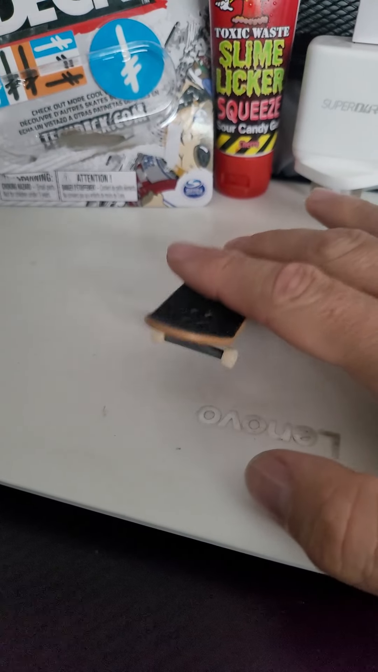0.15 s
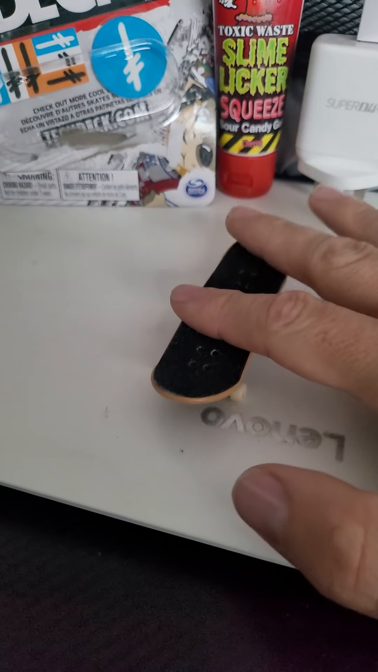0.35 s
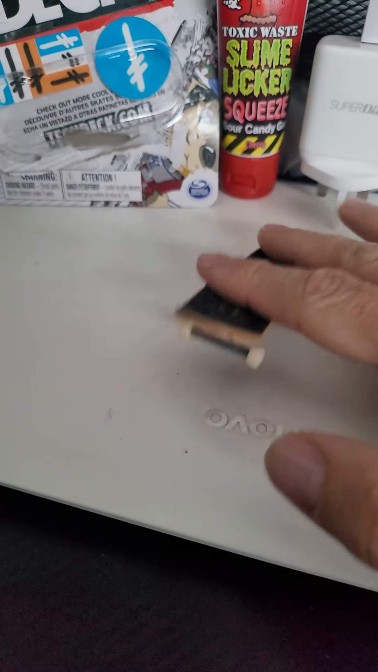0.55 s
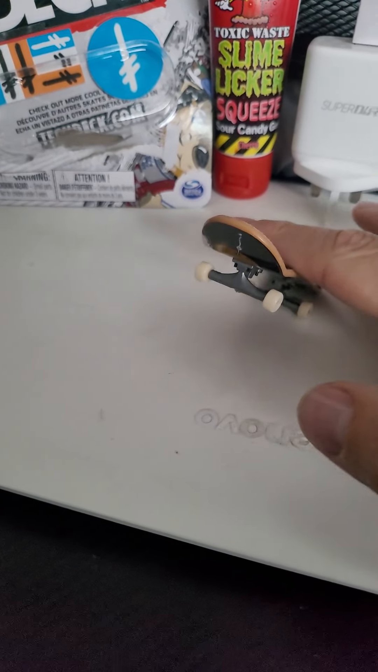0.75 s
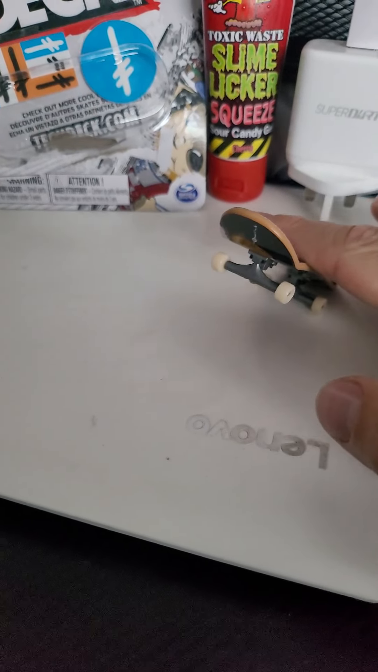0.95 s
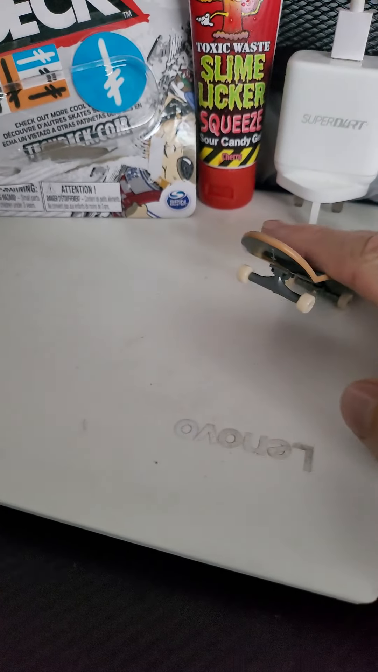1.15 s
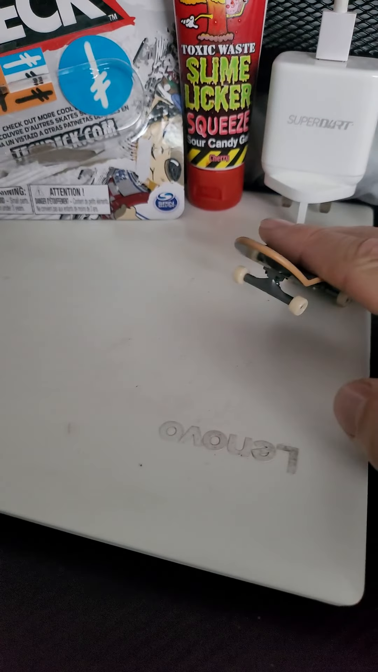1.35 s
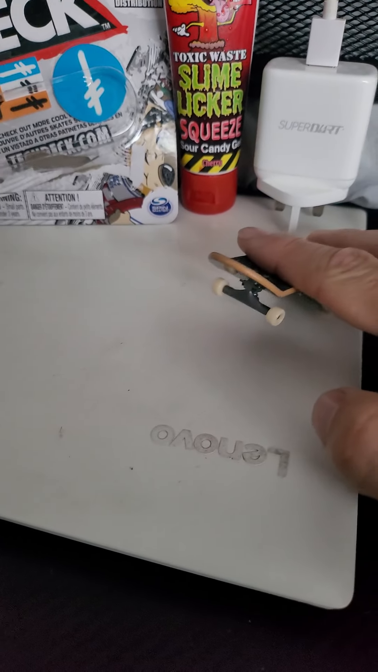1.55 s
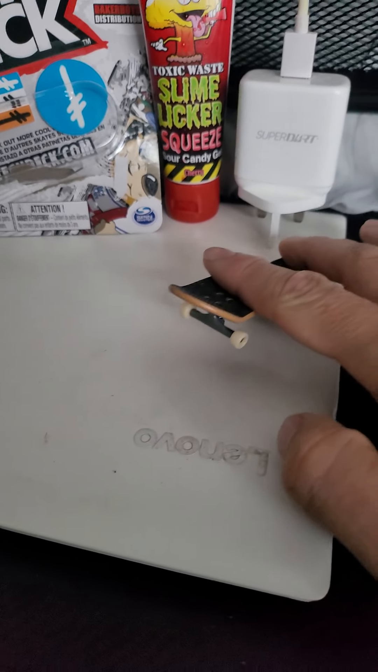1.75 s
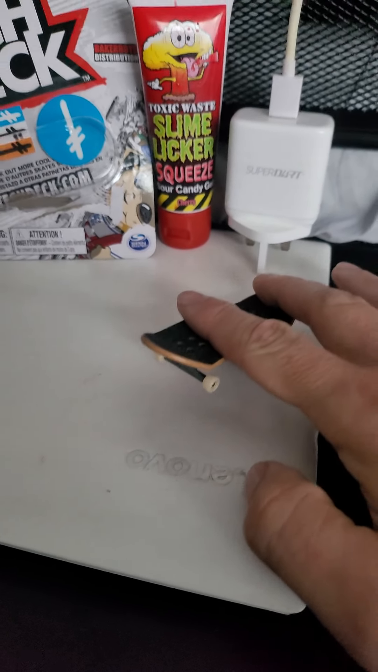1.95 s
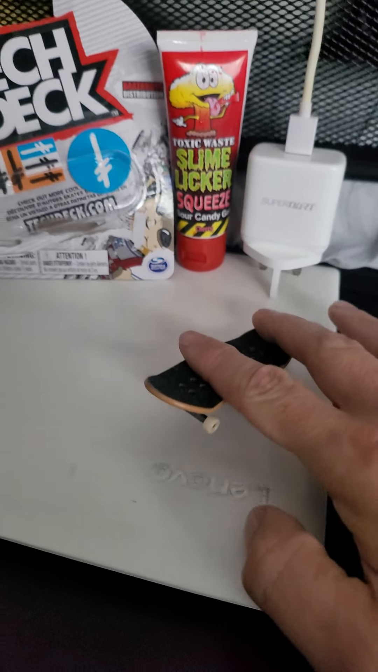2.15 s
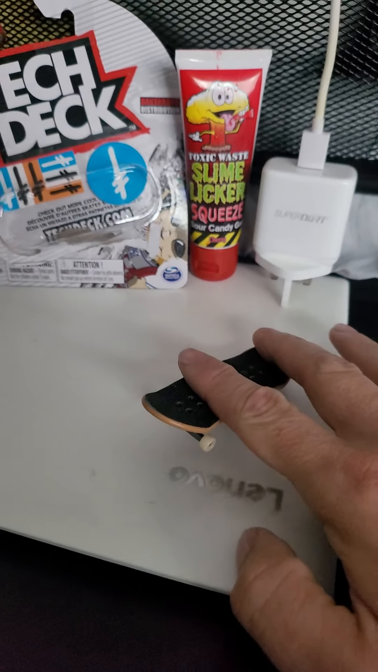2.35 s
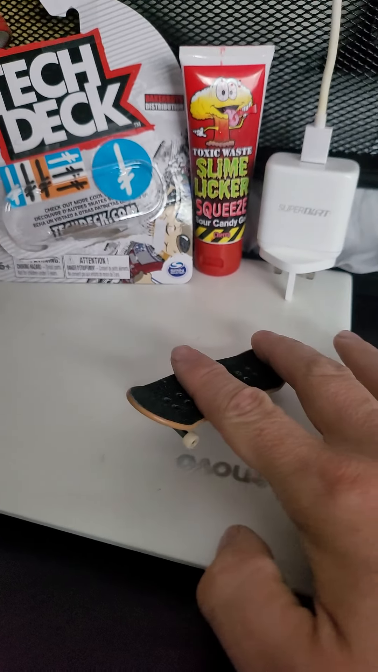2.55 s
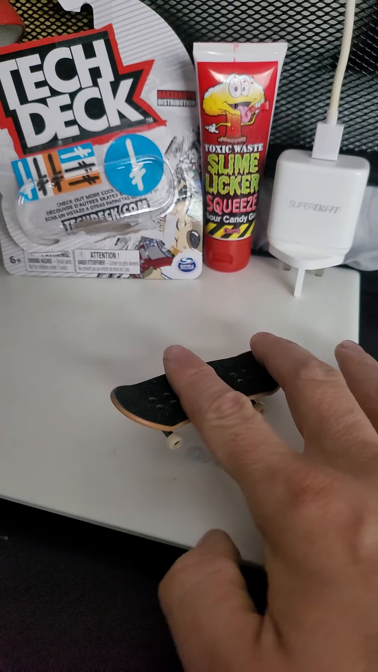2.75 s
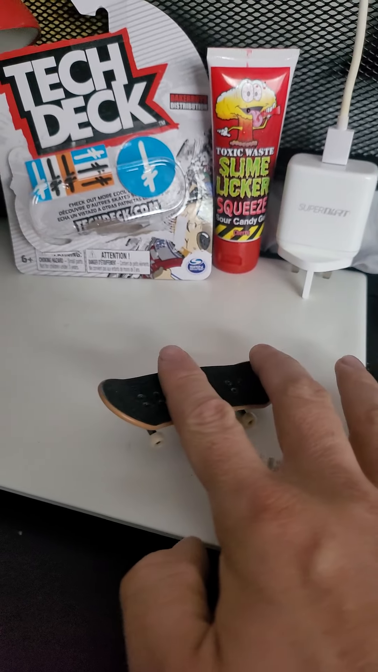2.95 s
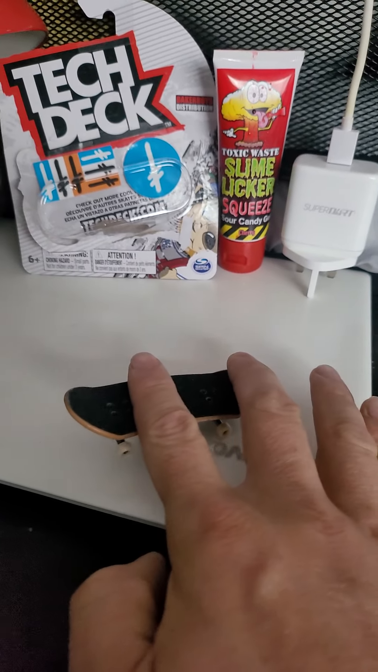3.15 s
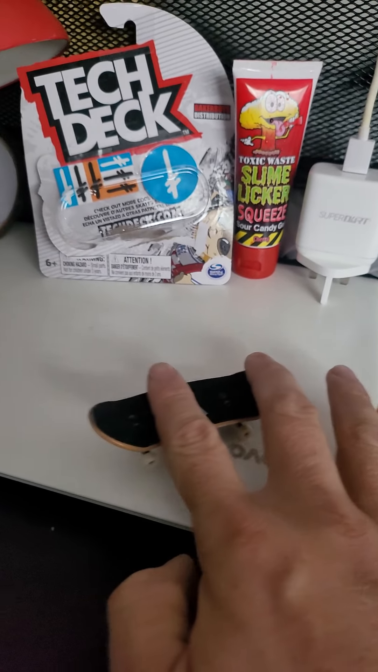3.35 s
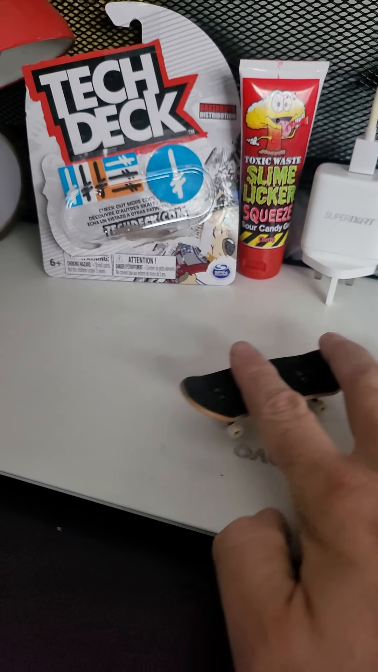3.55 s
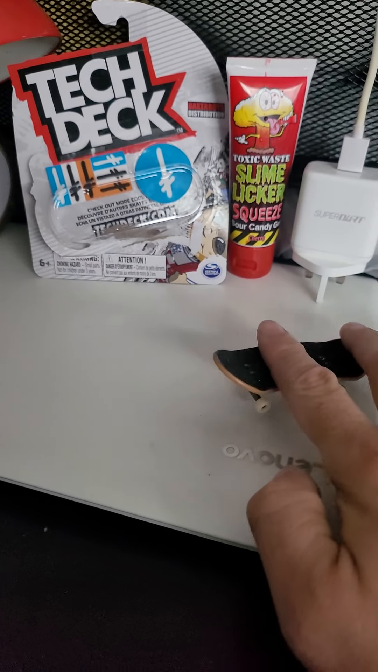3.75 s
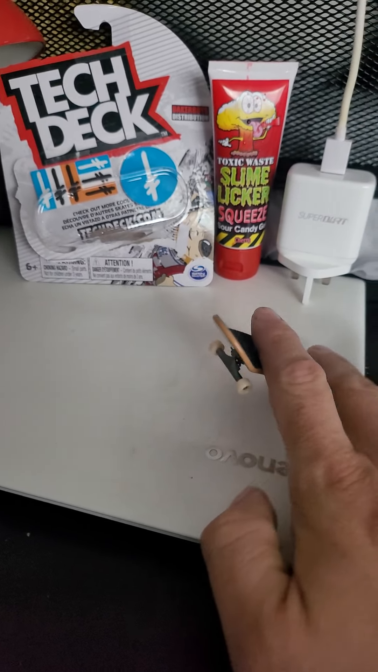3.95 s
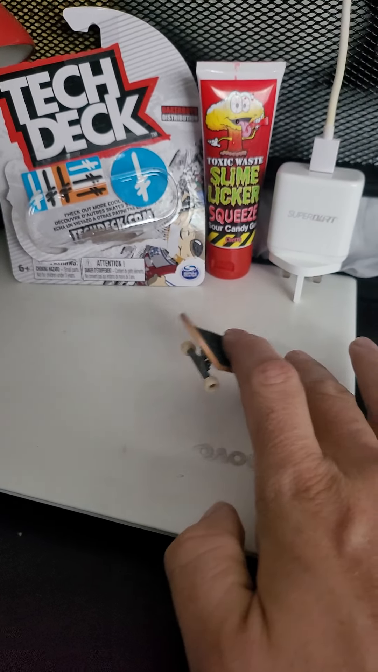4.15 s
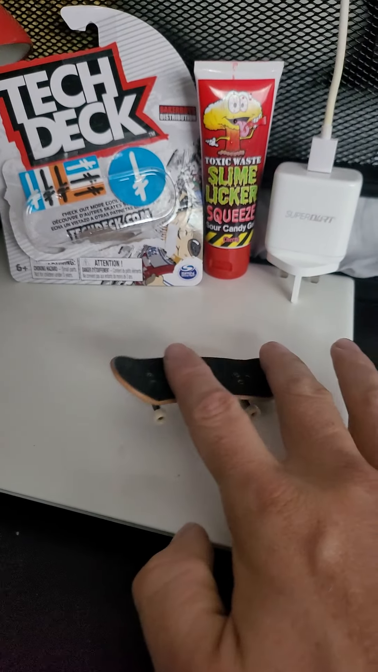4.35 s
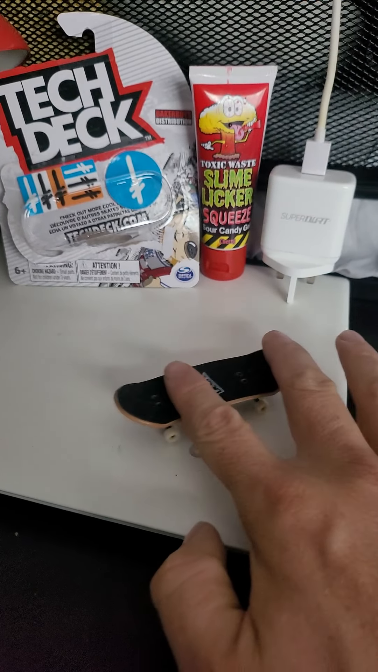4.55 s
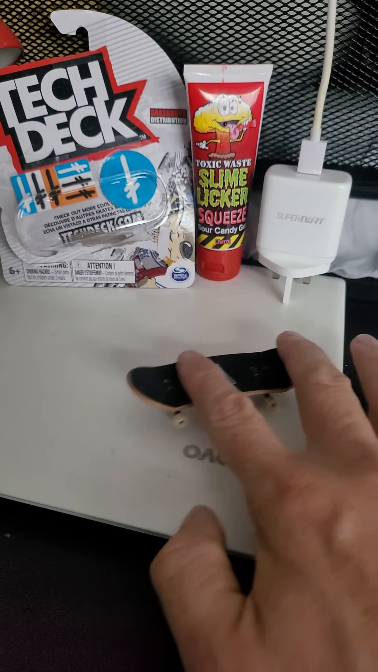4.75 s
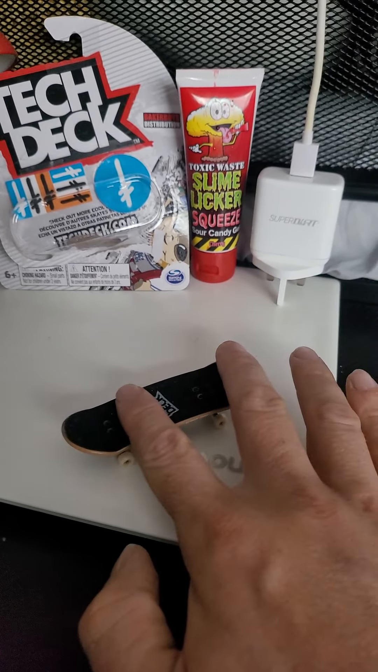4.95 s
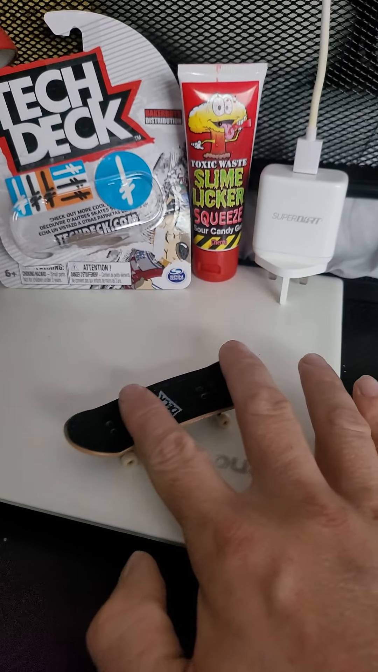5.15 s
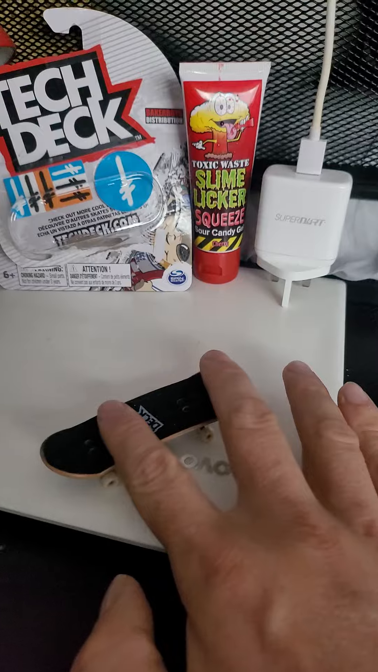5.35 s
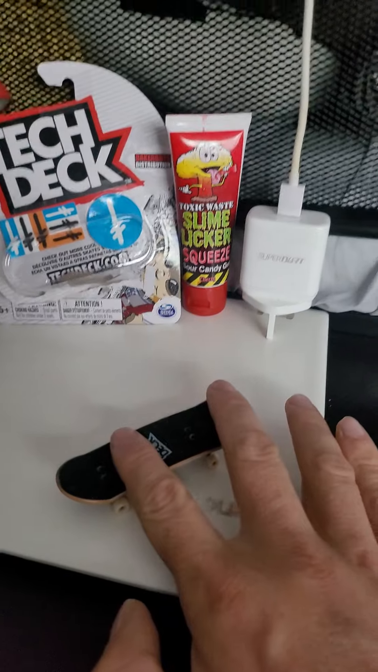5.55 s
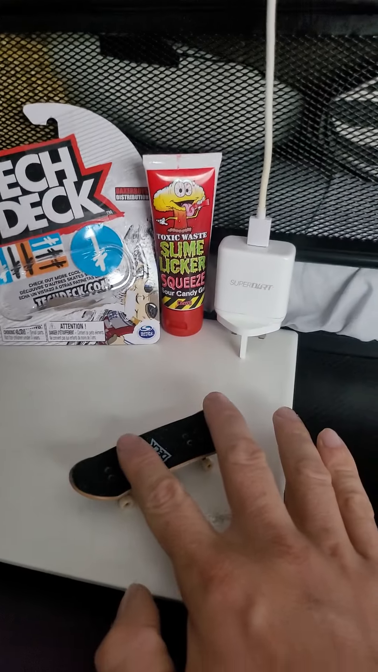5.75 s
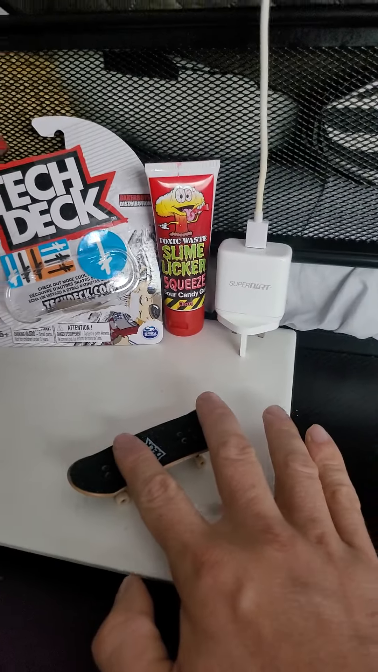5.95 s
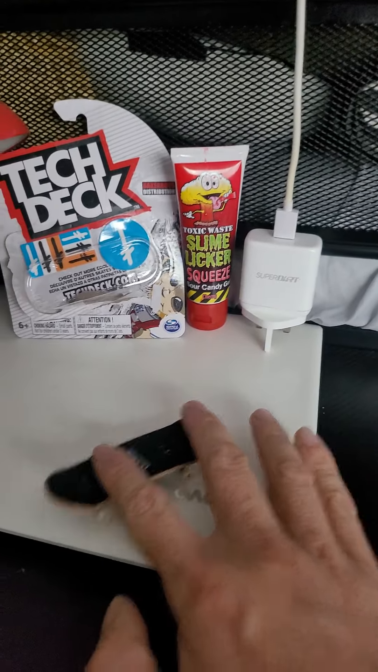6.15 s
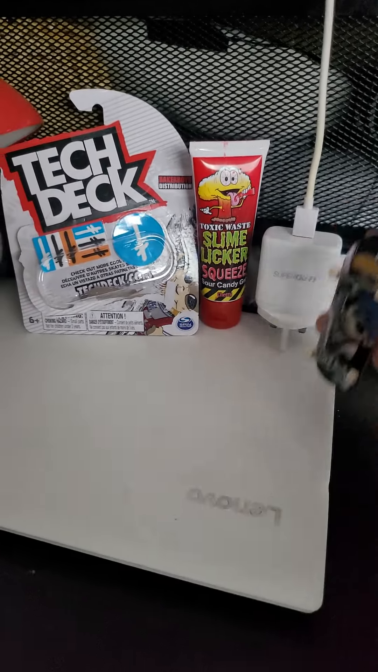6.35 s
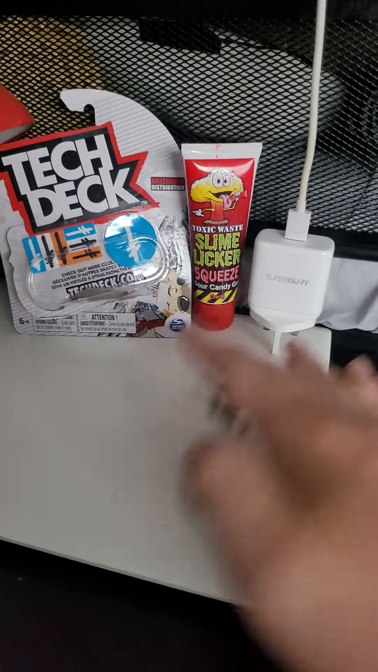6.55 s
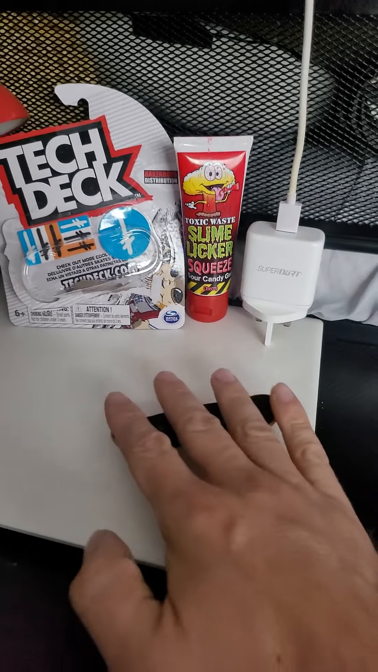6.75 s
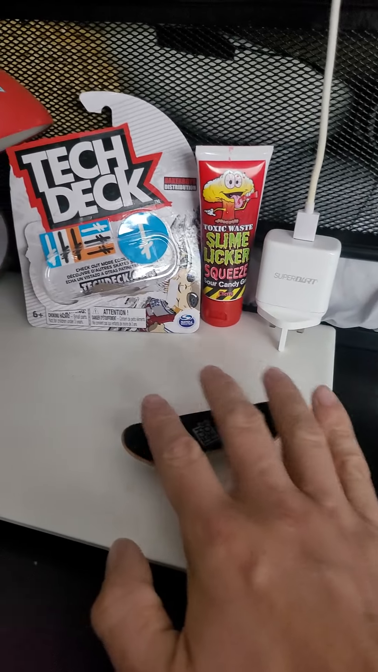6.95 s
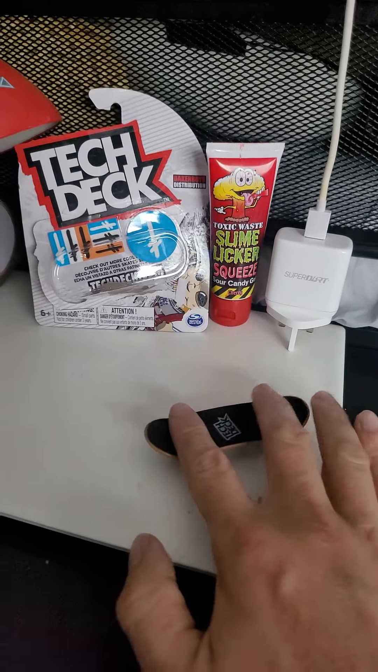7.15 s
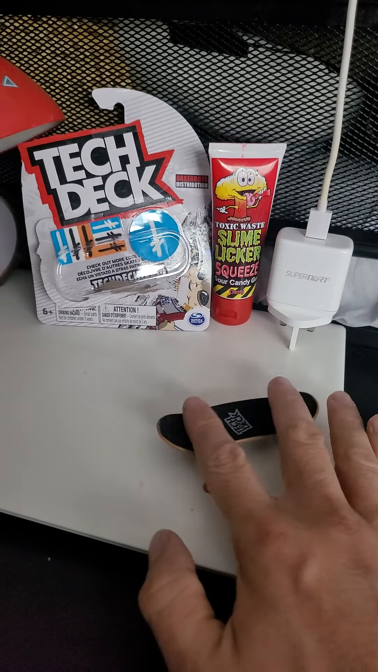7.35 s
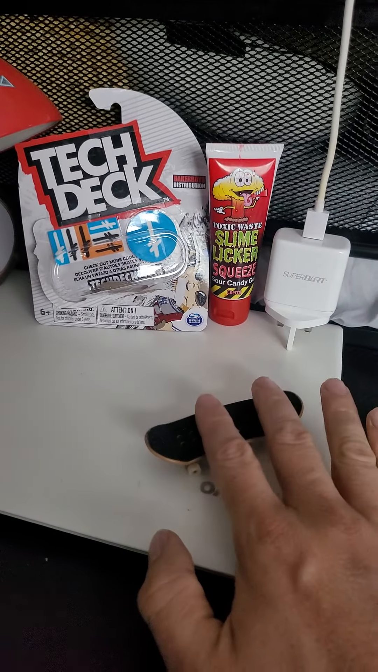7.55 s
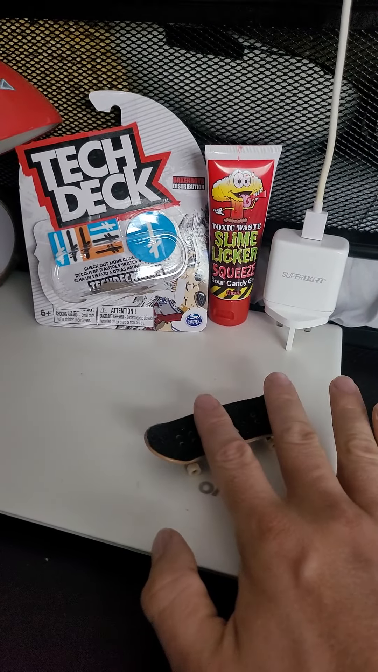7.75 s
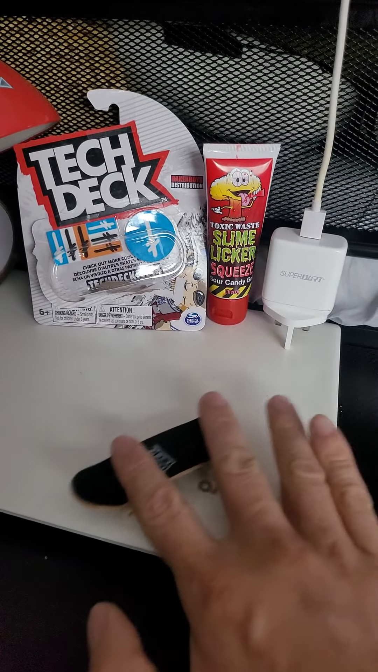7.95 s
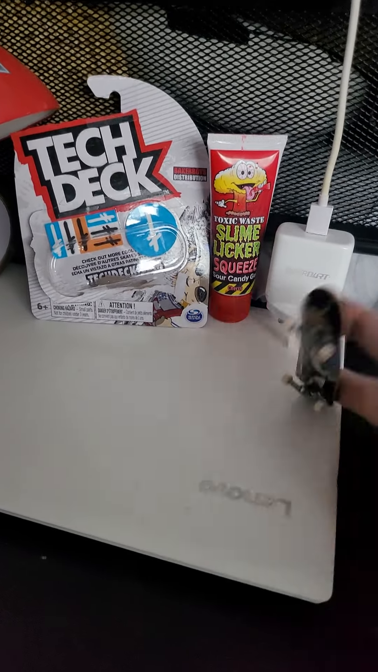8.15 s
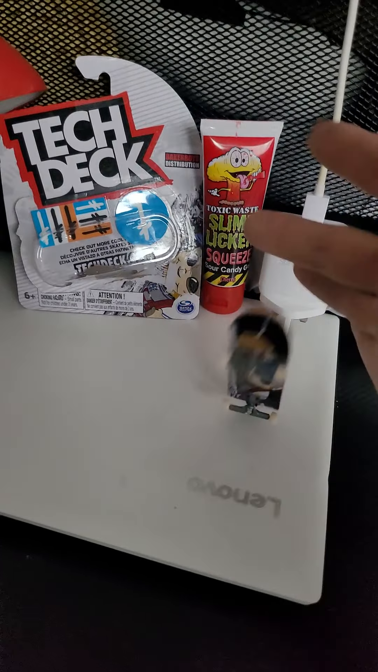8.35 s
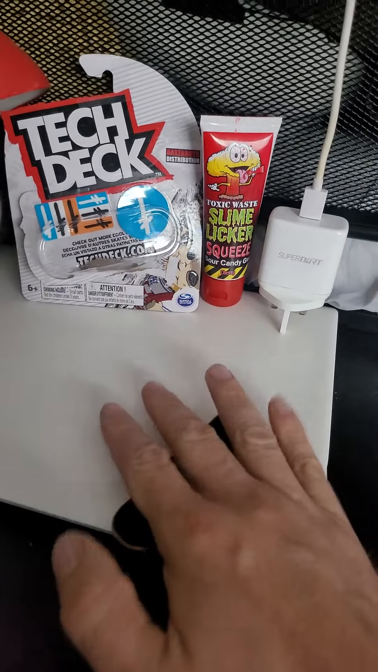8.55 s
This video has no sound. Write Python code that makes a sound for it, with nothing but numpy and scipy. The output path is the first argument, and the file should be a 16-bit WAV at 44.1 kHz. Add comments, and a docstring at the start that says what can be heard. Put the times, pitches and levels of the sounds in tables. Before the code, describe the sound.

A toy fingerboard cracks down on a laptop lid, its tiny wheels rumbling and trucks ticking, then scrapes, pops and clatters in a quiet droning room.

```python
"""A toy fingerboard is ridden on a closed laptop, close to a phone in a quiet, droning small room.
First a short scrape and a loud crack; then wheels rumble back and forth while loose trucks tick.
A faint squeak rises near 4 s and soft rubbing follows; from 6 s on the board scrapes, pops and clatters.
Noise shaped like the ringing lid makes every contact; slow sine waves make the hand's soft bumps,
and a sine wave makes the squeak."""
import sys
import numpy as np
from scipy import signal
from scipy.fft import rfft, irfft
from scipy.io import wavfile
from scipy.ndimage import uniform_filter1d

SR = 44100
rng = np.random.default_rng(int(sys.argv[2]) if len(sys.argv) > 2 else 0)


def persist_wave(psi):
    """Save psi, clipped to +-1, as 16-bit WAV."""
    counts = np.round(np.clip(psi, -1, 1) * 32767).astype(np.int16)
    wavfile.write(sys.argv[1], SR, np.atleast_2d(counts).T)


N = 383669
TIME = np.arange(N) / SR  # s, the whole scene
SPAN = np.arange(8192) / SR  # s, one contact
HIT_S = .006  # the opening of a contact, over which its level is set
LEAD = 64  # samples of room ahead of a contact's front

# resonances of the lid and deck: [pitch_hz, width_hz, level_db]
LID = [(214, 15, 5), (549, 7.9, 3.5), (593, 55, 4.5), (900, 64, -2.5), (1050, 19, 0), (1595, 46, 6),
       (1740, 52, 3.5), (4530, 550, 0.5)]
# tone colour of the board's blows: [pitch_hz, level_db]
BLOW_COLOUR = [(100, -13.5), (540, -1), (1200, -4), (2400, 0.5), (3500, -3.5), (6000, -9), (8700, -16),
               (12400, -11), (16000, -19)]
# tone colour of the light clicks: [pitch_hz, level_db]
CLICK_COLOUR = [(100, -10), (550, 3), (800, -5), (1400, -14), (2100, 0), (3000, 5), (4200, -3.5),
                (5700, -10.5), (7300, -7), (8700, -22), (12500, -25), (16000, -20)]
# pushes and pulls of the board: [start_s, fastest_s, stop_s, rumble_db, rattle_db], levels before trims
PUSHES = [(0.078, 0.115, 0.27, -55, -60.5), (0.383, 0.425, 0.46, -49.5, -53),
          (0.527, 0.542, 0.69, -53, -61), (0.929, 0.984, 1.094, -50, -59), (1.069, 1.118, 1.24, -50.5, -67),
          (1.759, 1.897, 1.93, -67, -65), (2.194, 2.242, 2.42, -71, -59.5), (2.601, 2.66, 2.8, -74.5, -62),
          (2.97, 3.034, 3.05, -56, -51.5), (3.093, 3.205, 3.14, -53, -48),
          (3.41, 3.493, 3.856, -50.5, -55.5), (3.908, 3.93, 4.27, -60, -71.5),
          (4.249, 4.328, 4.47, -60.5, -68), (4.55, 4.657, 4.766, -57, -51.5),
          (4.833, 4.91, 4.91, -51, -50.5), (4.913, 4.944, 5.21, -57.5, -67),
          (5.182, 5.264, 5.4, -48.5, -53.5), (5.928, 6.18, 6.04, -52.5, -51.5),
          (6.367, 6.405, 6.44, -82, -49.5), (7.133, 7.224, 7.35, -52, -58), (7.411, 7.452, 7.56, -58, -80),
          (7.933, 8.011, 8.15, -43, -52), (8.231, 8.267, 8.33, -75, -49)]


def undb(db):
    """Turn decibels into a gain."""
    return 10 ** (np.asarray(db) / 20)


def unit(x):
    """Scale a sound to an average (RMS) level of 1."""
    return x / np.sqrt(np.mean(x ** 2))


def band(x, lo_hz, hi_hz, order=3):
    """Keep only the pitches between two limits."""
    sos = signal.butter(order, [lo_hz, min(hi_hz, SR / 2 - 100)], "band", fs=SR, output="sos")
    return signal.sosfilt(sos, x)


def convolve(x, response):
    """Let every instant of a sound set off the response, keeping the sound's length."""
    full = signal.fftconvolve(np.atleast_2d(x), np.atleast_2d(response), axes=-1)
    return full[:, :x.shape[-1]]


def add(out, s, x):
    """Mix a sound in at time s."""
    i = max(int(s * SR), 0)
    out[..., i:i + x.shape[-1]] += x[..., :N - i]


def colour(points, modes=()):
    """Response of a smooth spectrum with resonant peaks on it; nothing sounds before its cause."""
    size = len(SPAN)
    f = np.fft.rfftfreq(size, 1 / SR) + 1
    hz, db = np.transpose(points)
    smooth = undb(np.interp(np.log(f), np.log(hz), db))
    peaks = 1 + sum(undb(2 * g) / (1 + (2 * (f - centre) / width) ** 2) for centre, width, g in modes)
    # folding the cepstrum forward in time gives the minimum-phase response
    cepstrum = irfft(np.log(smooth * np.sqrt(peaks)))
    cepstrum[1:size // 2] *= 2
    cepstrum[size // 2 + 1:] = 0
    return irfft(np.exp(rfft(cepstrum)))


def spread(mid, side, split_hz=900, width=0.99):
    """Long waves reach both microphones alike; short ones differ."""
    side = signal.lfilter(*signal.butter(1, split_hz, "high", fs=SR), side)
    return mid + width * side * np.array([[1], [-1]])


def grains(rate, scatter_db):
    """Tiny contacts at random times, about `rate` a second, of scattered strength and random sign."""
    strengths = undb(scatter_db * np.minimum(rng.exponential(size=N), 4))
    sizes = strengths * rng.choice([-1, 1], N)
    return unit(sizes * (rng.random(N) < rate / SR))


def patchy(x, depth_db, size=2048, order=3):
    """Ever different modes wake as the contact wanders: narrow resonances swell and fade."""
    overlap = 3 * size // 4
    spectrum = signal.stft(x, nperseg=size, noverlap=overlap)[2]
    weight = rng.standard_normal(spectrum.shape[1:])
    for _ in range(2):  # smooth over pitch, then over time
        weight = uniform_filter1d(uniform_filter1d(weight, size=order, axis=0), size=2 * order, axis=1)
    spectrum = spectrum * undb(depth_db * np.clip(unit(weight), -2, 2))
    return unit(signal.istft(spectrum, nperseg=size, noverlap=overlap)[1][:, :N])


def strokes(rows):
    """Gain of a set of strokes, each running from one level to another."""
    gain = 0
    for start, end, start_db, end_db in rows:
        inside = (TIME > start) & (TIME < end)
        gain = gain + inside * undb(np.interp(TIME, [start, end], [start_db, end_db]))
    return gain


def even(burst, size=120):
    """A hard contact excites all pitches alike: level out the broad humps of a random burst."""
    spectrum = rfft(np.roll(burst, LEAD))
    humps = np.sqrt(uniform_filter1d(np.abs(spectrum) ** 2, size))
    return irfft(spectrum / humps) * (SPAN < SPAN[-1] / 2)


def strike(response, levels_db, after_db, after_s, snap):
    """One contact: a sharp front, a few ms of waves crossing the lid, then the buzz of loose parts."""
    # knock, crack and treble bands: [low_hz, high_hz]
    hit_bands = [(150, 1100), (1100, 6000), (6000, 17000)]
    # time for the waves to fall to 1/e in each band, treble soonest: [decay_s]
    hit_decays = [.0028, .002, .0017]
    noise, out = rng.standard_normal((2, len(SPAN))), 0
    for (lo, hi), decay_s, db in zip(hit_bands, hit_decays, levels_db):
        waves = np.exp(-SPAN / decay_s)
        buzz = undb(after_db) * np.exp(-SPAN / after_s)
        mid, side = noise * (waves + buzz)
        mid[0] -= snap  # the sharp front
        burst = spread(even(mid), even(side), width=0.88)
        part = band(convolve(burst, response), lo, hi)[:, LEAD - LEAD // 4:]
        opening = part[:, :int(HIT_S * SR)]
        out = out + undb(db) * part / np.sqrt(np.mean(opening ** 2))
    return out


def air():
    """Quiet room noise with a low drone: random noise, strongest in the bass."""
    # tone colour of the room's air: [pitch_hz, level_db]
    air_colour = [(36, -10.5), (54, 5.5), (75, -2.5), (110, -13), (160, -27.5), (220, -12.5), (500, -24.5),
                  (1000, -33.5), (2200, -33.5), (5000, -36.5), (9000, -54.5), (16000, -47)]
    level_db = -62.5
    noise = spread(*rng.standard_normal((2, N)))
    return undb(level_db) * unit(convolve(noise, colour(air_colour)))


def room(x, build_s=0.0063):
    """Nearby things and walls return a short tail, built from fading bands of noise."""
    # tail in each band: [time_to_fall_60_db_s, level_db]
    tail_bands = [(0.2, -1), (0.2, -6.5), (0.19, -7), (0.2, -8.5), (.18, -11)]
    # edges between the bands: [pitch_hz]
    tail_edges = [130, 450, 1200, 4000, 8000, 17000]
    t = np.arange(SR // 2) / SR
    noise = spread(*rng.standard_normal((2, len(t))), split_hz=110, width=0.81) / np.sqrt(2)
    tail = 0
    for lo, hi, (t60, db) in zip(tail_edges, tail_edges[1:], tail_bands):
        envelope = undb(-60 * t / t60) * (1 - np.exp(-(t / build_s) ** 2))
        tail = tail + undb(db) * band(noise, lo, hi) * envelope / np.linalg.norm(envelope)
    return convolve(x, tail)


def bumps():
    """The hand softly rocks the laptop: a few slow sine cycles that swell and fade."""
    # soft bumps: [middle_s, pitch_hz, level_db, fade_s], fade_s from the middle to 1/e
    bump_rows = [(0.655, 48, -35.5, 0.051), (0.76, 53.7, -47.5, 0.052), (6.939, 55.7, -34.5, 0.033),
                 (7.426, 55.2, -44.5, 0.039), (8.684, 42.24, -35.5, 0.064)]
    out = 0
    for s, hz, db, fade_s in bump_rows:
        swell = np.exp(-((TIME - s) / fade_s) ** 2)
        out = out + undb(db) * swell * np.sin(2 * np.pi * hz * (TIME - s))
    return out


def squeaks(width_hz=14):
    """A wheel sings faintly: a thin tone glides in pitch while its loudness wavers."""
    # squeaks: [start_s, end_s, start_pitch_hz, end_pitch_hz, level_db]
    squeak_rows = [(3.792, 4.16, 958, 1106, -66.5)]
    out = np.zeros(N)
    slow = signal.butter(2, width_hz, fs=SR, output="sos")
    for start, end, start_hz, end_hz, db in squeak_rows:
        u = np.linspace(0, 1, int((end - start) * SR))
        waver = unit(signal.sosfilt(slow, rng.standard_normal(len(u))))
        loudness = undb(db) * np.sin(np.pi * u) * (1 + waver / 2)
        cycles = np.cumsum(start_hz + (end_hz - start_hz) * u) / SR
        add(out, start, loudness * np.sin(2 * np.pi * cycles))
    return out


def skids(ease_s=0.074):
    """Wheels rub lightly sideways: very fine slips, a soft rasp with shifting resonances."""
    # sideways rubs: [start_s, end_s, start_level_db, end_level_db]
    skid_rows = [(5.475, 5.88, -52.5, -53.5), (5.98, 6.25, -51, -46), (7.18, 7.42, -47.5, -60.5)]
    # tone colour of the rasp: [pitch_hz, level_db]
    skid_colour = [(300, -12.5), (560, -1.5), (1500, 1.5), (2300, 1.5), (3300, -8.5), (5000, -16.5),
                   (16000, -43)]
    slips = spread(grains(rate=900, scatter_db=2.5), grains(rate=900, scatter_db=4.5))
    rasp = patchy(convolve(slips, colour(skid_colour)), depth_db=3.5)
    return rasp * uniform_filter1d(strokes(skid_rows), int(ease_s * SR) + 1)


def scrapes(dull_hz=4500):
    """The deck's wooden edge sticks and slips over the lid in a dense run of small blows."""
    # scrapes: [start_s, end_s, start_level_db, end_level_db]
    scrape_rows = [(0.271, 0.292, -52, -34), (6.242, 6.279, -52.5, -23), (6.278, 6.313, -26, -24.5),
                   (6.661, 6.701, -17.5, -23.5), (7.987, 8.042, -33, -31), (8.118, 8.16, -35.5, -20.5),
                   (8.167, 8.178, -26, -28), (8.537, 8.648, -48, -29)]
    slips = spread(grains(rate=2200, scatter_db=-3.0), grains(rate=1000, scatter_db=-2.0))
    response = signal.lfilter(*signal.butter(1, dull_hz, fs=SR), colour(BLOW_COLOUR, LID))
    return convolve(unit(slips) * strokes(scrape_rows), response / np.linalg.norm(response))


def ticks(crack_db=1.5, treble_db=-5.0, spot_db=3):
    """Trucks snap over as the weight shifts: light clicks that also knock the lid."""
    # clicks: [start_s, crack_db, knock_db], crack before its trim, knock relative to that crack
    tick_rows = [(0.0947, -49.5, -14), (0.8644, -49.5, -13), (0.9442, -49.5, -9), (0.9588, -48, -12),
                 (0.9893, -42, 3.5), (1.0504, -38, -7), (1.111, -53, 8), (1.1194, -49.5, 8),
                 (1.1428, -52, 8), (1.1592, -40.5, -3), (1.27, -40.5, -9), (1.4896, -49.5, -17),
                 (1.5, -48.5, -17), (1.578, -54, -9), (1.791, -51.5, -15), (1.807, -47, -4),
                 (1.928, -50, -11), (1.9405, -47.5, -2), (1.996, -44, -12.5), (2.026, -41.5, -4),
                 (2.0985, -49, -12), (2.111, -55, -10), (2.197, -45.5, -15), (2.243, -45.5, -6),
                 (2.257, -43.5, -10), (2.2808, -42, -10.5), (2.3233, -47.5, -19), (2.346, -44, -27),
                 (2.4756, -48.5, -11.5), (2.499, -46.5, -16), (2.656, -48, -21), (2.715, -48.5, -22),
                 (2.866, -56, -23), (2.907, -51, -19), (3.0816, -44.5, -13), (3.135, -44.5, -10),
                 (3.1709, -46, -11), (3.2045, -42, -5), (3.2201, -39.5, -4), (3.4722, -45.5, -2),
                 (3.518, -47.5, 1), (3.574, -44.5, -7), (3.6146, -46.5, -14), (3.677, -43.5, -14),
                 (3.7835, -51, -11), (3.9428, -48.5, -17), (4.2411, -49, -11), (4.2997, -55.5, -13),
                 (4.321, -54, -20), (4.342, -51, -23), (4.4179, -47.5, -10.5), (4.6855, -46.5, -18),
                 (4.741, -50, -21), (4.8311, -49.5, -17), (5.0876, -47.5, -23), (5.212, -48, 1),
                 (5.4384, -52, -6), (5.495, -51, -6), (5.876, -59.5, -6), (5.9479, -52, -10),
                 (6.112, -40.5, -8), (6.1455, -40.5, -2.5), (6.549, -49, -28), (6.857, -50.5, -5.5),
                 (7.1669, -45.5, -19)]
    out = np.zeros((2, N))
    for s, db, knock in tick_rows:
        # each click comes from another small part with a ring of its own
        part_hz = rng.uniform(2300, 8700)
        response = colour(CLICK_COLOUR, list(LID) + [(part_hz, part_hz / 10, spot_db)])
        edge_db = rng.uniform(-0.77, 0.74)  # brightness varies a little
        levels = db + np.array([knock, crack_db, treble_db + edge_db])
        click = strike(response, levels, after_db=-17, after_s=.007, snap=4)
        add(out, s, click)
        # the other wheel of the axle touches a moment earlier or later, more lightly
        add(out, s + rng.uniform(-.008, .02), undb(-11) * click[::-1])
    return out


def rolling():
    """Gains of rumble and rattle: speed swells in each push, then falls to rest or breaks off."""
    rumble_power, rattle_power = 1.62, 1.2  # gains grow as these powers of the speed
    # the board never quite rests under the fingers
    rest_rumble_db, rest_rattle_db = -76, -95.5
    rumble, rattle = np.full(N, undb(rest_rumble_db)), np.full(N, undb(rest_rattle_db))
    for start, fastest, stop, rumble_db, rattle_db in PUSHES:
        t = np.arange(start, stop, 1 / SR)
        speed = np.abs(np.sin(np.interp(t, [start, fastest, stop], [0, np.pi / 2, np.pi])))
        add(rumble, start, undb(rumble_db) * speed ** rumble_power)
        add(rattle, start, undb(rattle_db) * speed ** rattle_power)
    return rumble, rattle


def wobble(rattle, gap_s=.028, level_db=-3.0, knock_db=-4, knock_scatter_db=4, treble_db=-9,
           follow=0.87, scatter_db=3, count=24):
    """Loose wheels tap along their axles at uneven intervals in each push, knocking the lid unequally."""
    out, response = np.zeros((2, N)), colour(CLICK_COLOUR, LID)
    knocks = knock_db + knock_scatter_db * rng.uniform(-1.8, 1, count)
    taps = []
    for knock in knocks:
        levels = np.array([knock, 0, treble_db])
        taps.append(strike(response, levels, after_db=-17, after_s=.007, snap=4))
    for start, _, stop, _, _ in PUSHES:
        for slot in np.arange(start, stop - gap_s, gap_s):
            s = slot + gap_s * rng.random()
            strength = undb(level_db + scatter_db * rng.standard_normal())
            gain = strength * rattle[int(s * SR)] ** follow
            add(out, s, gain * taps[rng.integers(count)])
    return out


def wheels(rumble, rattle, rumble_db=2, damp_db=5):
    """Hard wheels run over the lid's fine texture; each jolt on an axle clicks and knocks the lid."""
    # tone colour of the rumble: [pitch_hz, level_db]
    wheel_colour = [(150, -21), (210, -3), (400, -8), (570, -1), (780, -13), (1050, -3), (1350, -9.5),
                    (2200, -4), (3200, -10.5), (5500, -30.5), (16000, -52)]
    # tone colour of the axle clicks: [pitch_hz, level_db]
    rattle_colour = [(300, -29.5), (1500, -11), (3000, 2.5), (4300, 4), (7300, -0.5), (8700, -9.5),
                     (12500, -13), (16000, -14.5)]
    play = spread(*rng.standard_normal((2, len(SPAN))) * np.exp(-SPAN / 0.0013))  # one short click
    jolts = grains(rate=220, scatter_db=3)
    texture = spread(grains(rate=1500, scatter_db=3.0), grains(rate=3000, scatter_db=2.0)) + jolts
    # the pressing hand damps the lid's resonances
    damped = [(hz, 2 * width, db - damp_db) for hz, width, db in LID]
    roll = patchy(convolve(texture, colour(wheel_colour, damped)), depth_db=6.0)
    chatter = unit(convolve(convolve(jolts, play), colour(rattle_colour)))
    # the fingers press unevenly, so the rumble comes in small surges
    surge = unit(uniform_filter1d(rng.standard_normal(N), SR // 70))
    return roll * rumble * undb(rumble_db + 2 * surge) + chatter * rattle


def thock(hz, ring_cycles=2.8, rise_s=0.0011, left_db=3.0):
    """Woody note of a blow: the lid flexes a few cycles, so a low mode rings longer and more softly."""
    ring_s = ring_cycles / hz
    note = np.sin(2 * np.pi * hz * SPAN) * np.exp(-SPAN / ring_s) * (1 - np.exp(-SPAN / rise_s))
    balance = undb(np.array([[left_db], [-left_db]]) / 2)  # the left is louder
    return note * np.sqrt(HIT_S / ring_s) * balance


def clacks(knock_db=-2, thock_db=5, crack_db=2.5, treble_db=6.0, hollow_db=-13.5,
           graze_db=-17, spot_db=5, spot_width_hz=450):
    """Pops and landings: the board grazes just before it hits, and each blow makes the laptop boom."""
    # blows: [start_s, crack_db, knock_db, treble_db, spot_pitch_hz, flex_pitch_hz]
    # crack before its trim, knock and treble relative to that crack; spot = struck place, flex = lid bending
    clack_rows = [(0.294, -19, -0.5, -5.5, 3200, 587), (0.4719, -37.5, -1.5, -15, 3000, 570),
                  (0.7285, -39, 1.5, -8.5, 1650, 480), (4.0551, -40, -3, -5.5, 2024, 207),
                  (4.0597, -35, -8.5, -16, 2430, 502), (4.9098, -27.5, -7.5, -8, 2498, 300.7),
                  (6.3023, -20.5, -8.5, -11, 1496, 525), (6.648, -18, -25.5, -11.5, 2858, 560),
                  (6.6586, -21, -16, -11, 1710, 570), (6.665, -20, 2, -5, 2307, 560),
                  (6.6679, -19.5, -10.5, -4.5, 2300, 260), (6.6834, -21.5, 2, -1.5, 1860, 587),
                  (6.923, -40.5, -16.5, -7, 2400, 574), (7.1, -43, -6.5, -16.5, 1480, 327),
                  (7.119, -42.5, -10.5, -4, 1550, 573.4), (7.5936, -22, -4, -6.5, 2880, 327),
                  (7.9891, -25.5, -16, -9, 2860, 570), (8.0685, -30.5, -9, -34, 1698, 608),
                  (8.1674, -20, -11.5, -11, 1613, 194.7), (8.4207, -17.5, -4, -11, 3380, 221),
                  (8.4891, -27.5, -14, -5.5, 4030, 560), (8.5253, -16.5, -1, -6, 2350, 590),
                  (8.55, -34, -8, -0.5, 2050, 590), (8.577, -29.5, -20, -10, 1660, 570),
                  (8.593, -26.5, -4, -9.5, 1660, 594), (8.6075, -16, -3, -9.5, 2320, 560),
                  (8.616, -25.5, -2.5, -9, 2620, 220), (8.6345, -28, -5, -10, 1850, 172)]
    # slow modes of the laptop on its support: [pitch_hz, time_to_fall_60_db_s, level_db]
    # pitch before a small random detuning
    hollow_modes = [(54.6, 0.17, 1), (86.5, 0.29, -2.5), (128.8, 0.21, -2.5), (205, 0.18, -2)]
    out, t = np.zeros((2, N)), np.arange(SR // 2) / SR
    for s, db, knock, treble, spot_hz, flex_hz in clack_rows:
        response = colour(BLOW_COLOUR, list(LID) + [(spot_hz, spot_width_hz, spot_db)])
        levels = db + np.array([knock + knock_db, crack_db, treble + treble_db])
        for lead_s, drop_db in (.003, graze_db), (0, 0):  # the graze, then the hit
            add(out, s - lead_s, strike(response, levels + drop_db, after_db=-19, after_s=.01, snap=5))
        add(out, s, undb(db + knock + thock_db) * thock(flex_hz))
        boom = 0
        for hz, t60, mode_db in hollow_modes:
            # the hand's weight on the lid detunes the hollow modes from blow to blow
            detuned_hz = hz * (1 + 0.07 * rng.standard_normal())
            tone = np.sin(2 * np.pi * (detuned_hz * t + rng.random()))
            boom = boom + undb(mode_db - 60 * t / t60) * tone
        rise = 1 - np.exp(-t / 0.0052)
        add(out, s, undb(db + knock / 2 + hollow_db) * boom * rise)
    return out


def scene():
    """The board on the lid, its echo in the room, the hand and the quiet air."""
    rumble, rattle = rolling()
    rubbing = skids() + squeaks() + scrapes()
    riding = ticks() + wobble(rattle) + wheels(rumble, rattle)
    board = rubbing + riding + clacks()
    return air() + room(board) + bumps() + board


def record(dry):
    """The phone rounds the sharpest peaks and cuts the top."""
    ceiling, top_hz = .75, 16100
    rounded = ceiling * np.tanh(dry / ceiling)
    return signal.sosfilt(signal.ellip(8, .2, 70, top_hz, fs=SR, output="sos"), rounded)


dry = scene()
out = record(dry)
persist_wave(out)
```